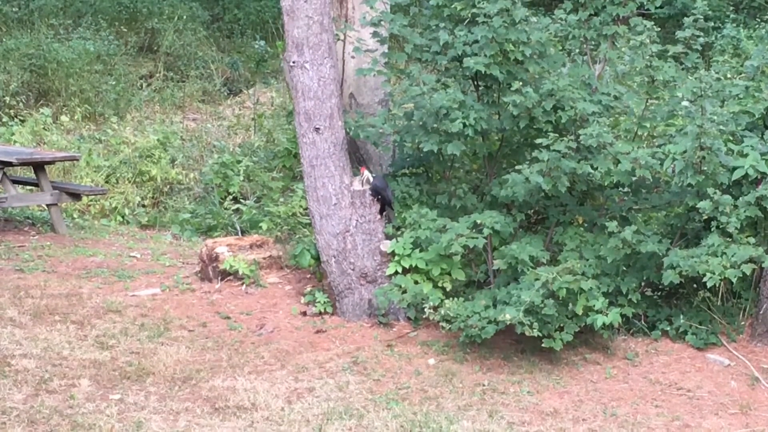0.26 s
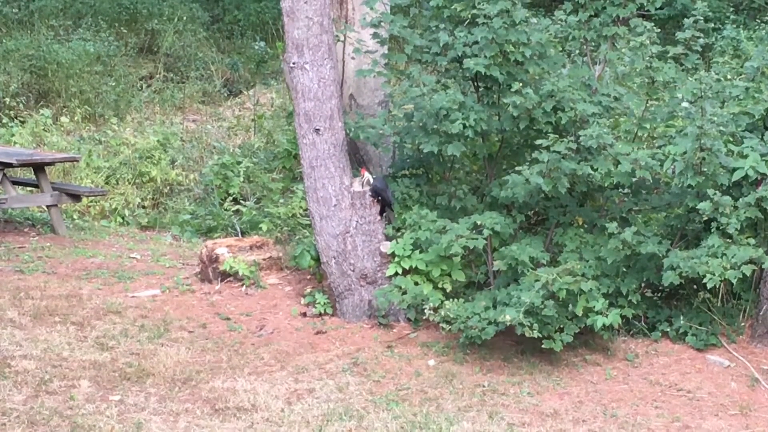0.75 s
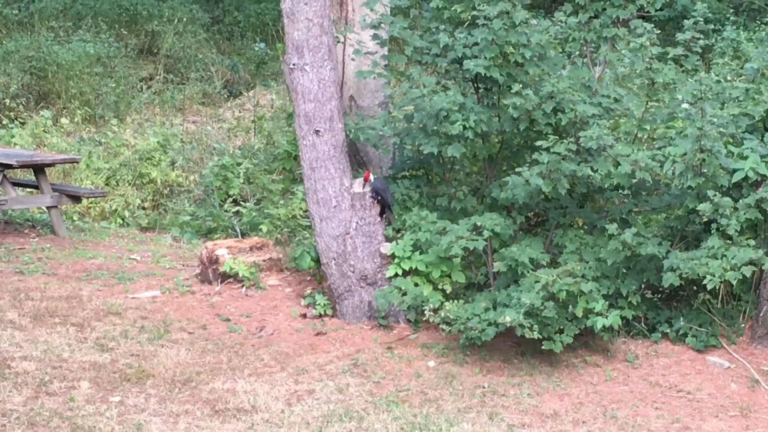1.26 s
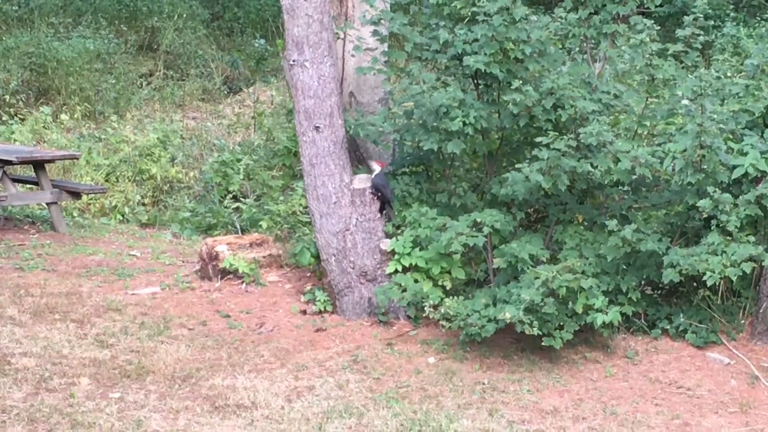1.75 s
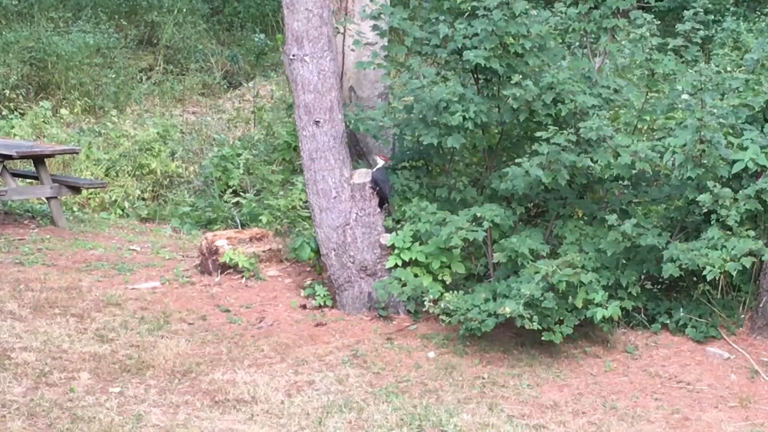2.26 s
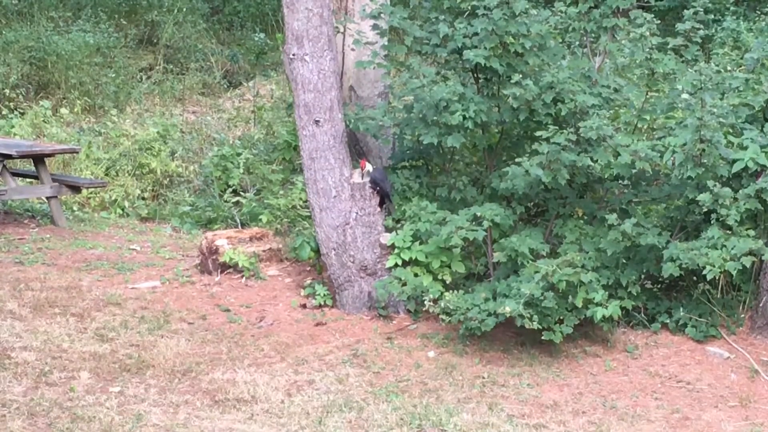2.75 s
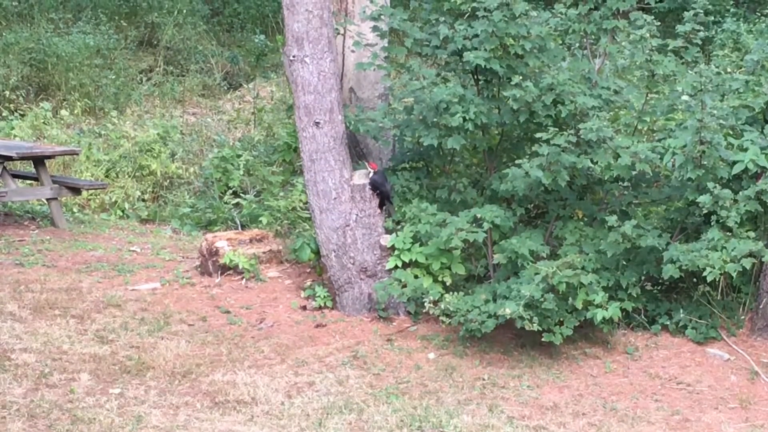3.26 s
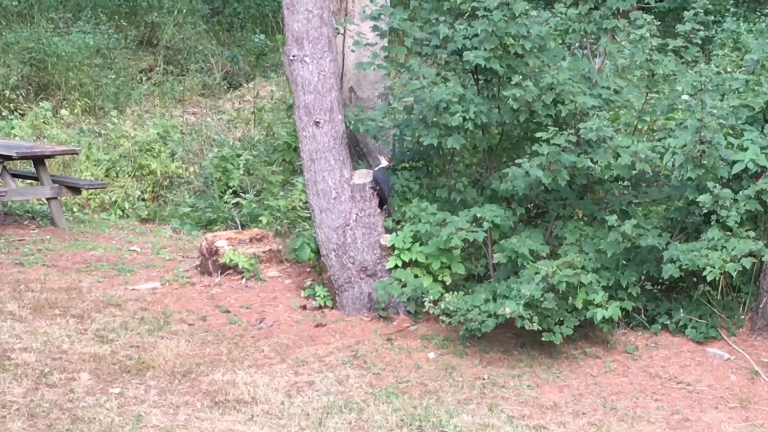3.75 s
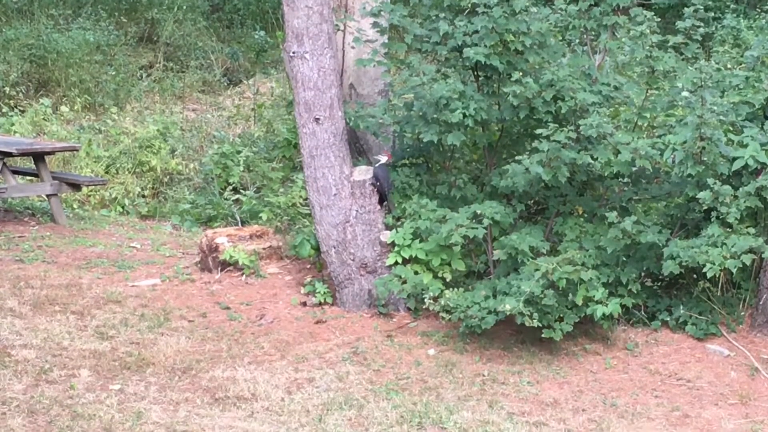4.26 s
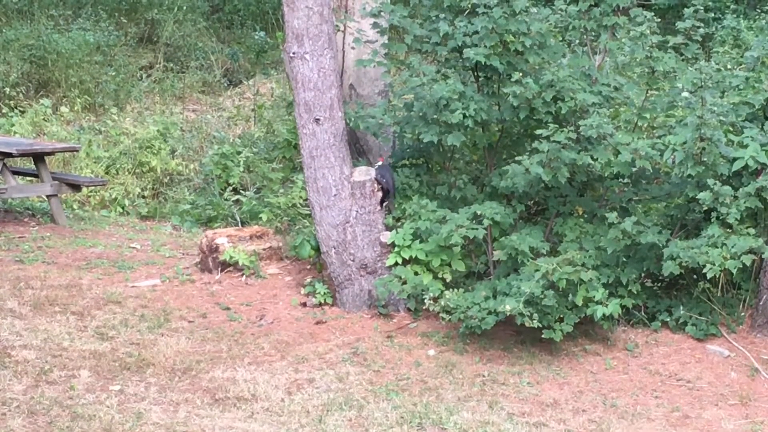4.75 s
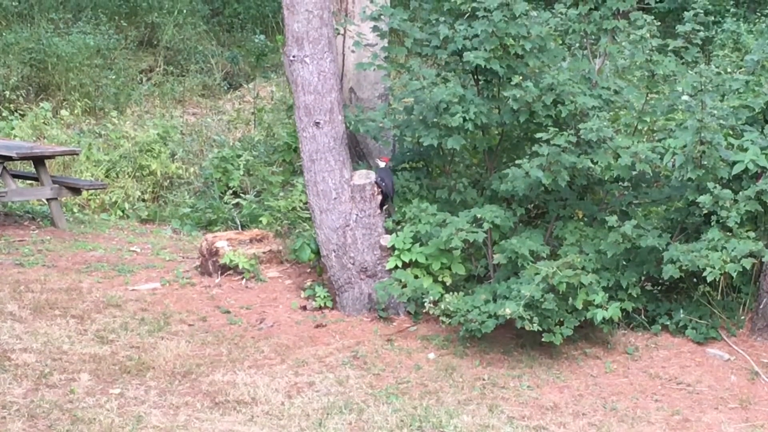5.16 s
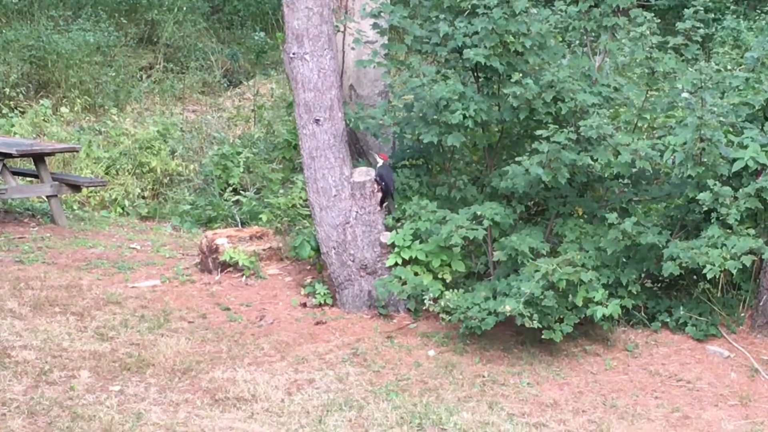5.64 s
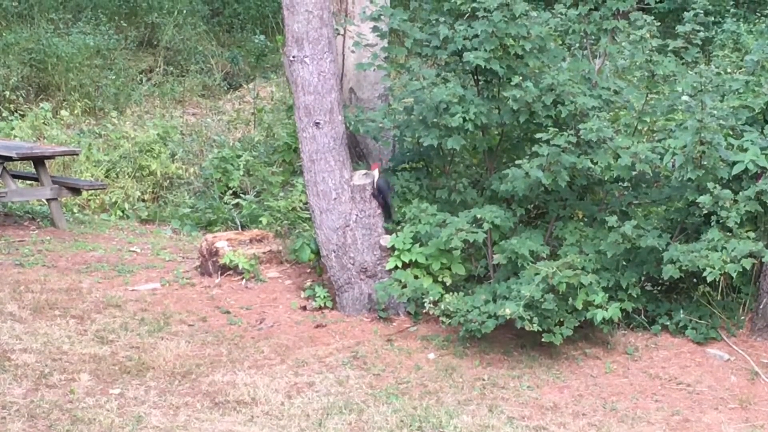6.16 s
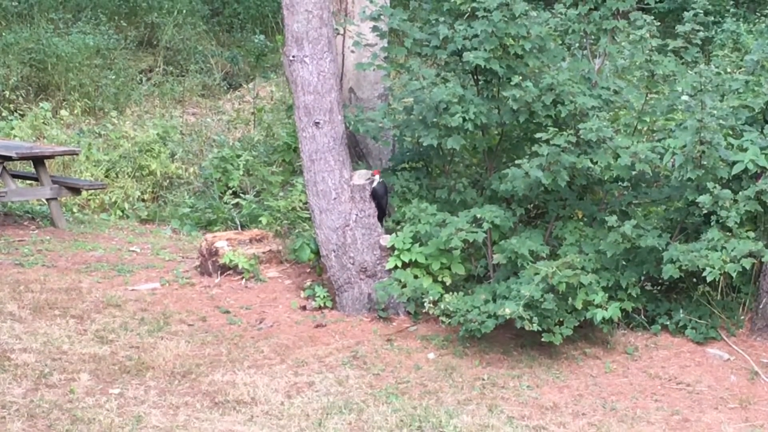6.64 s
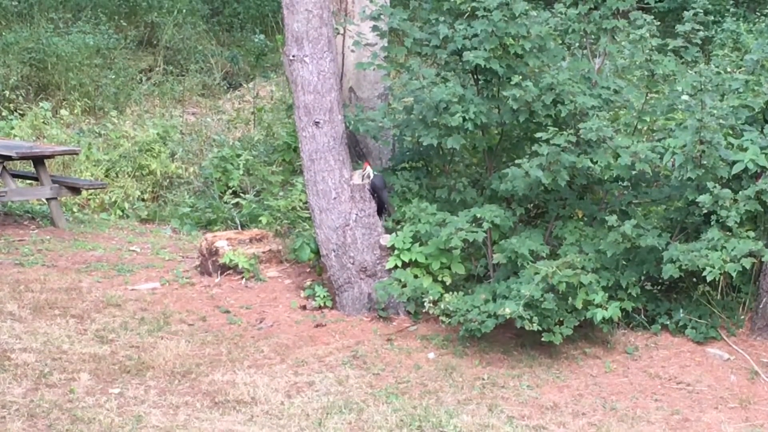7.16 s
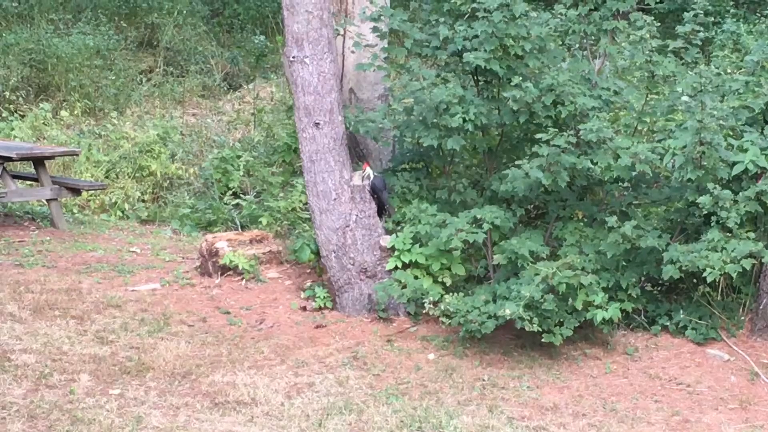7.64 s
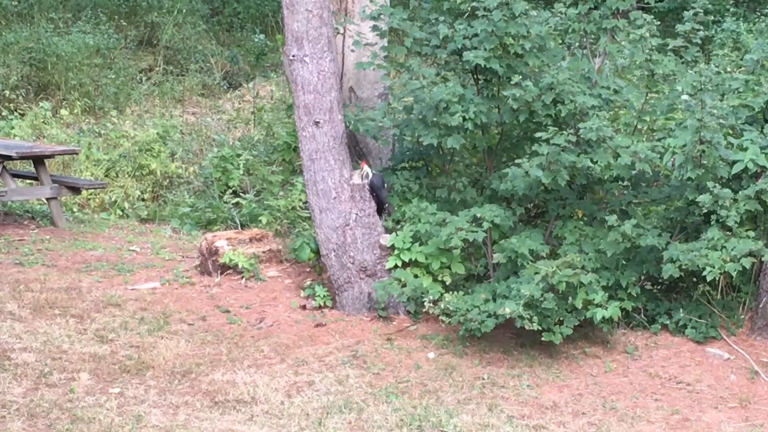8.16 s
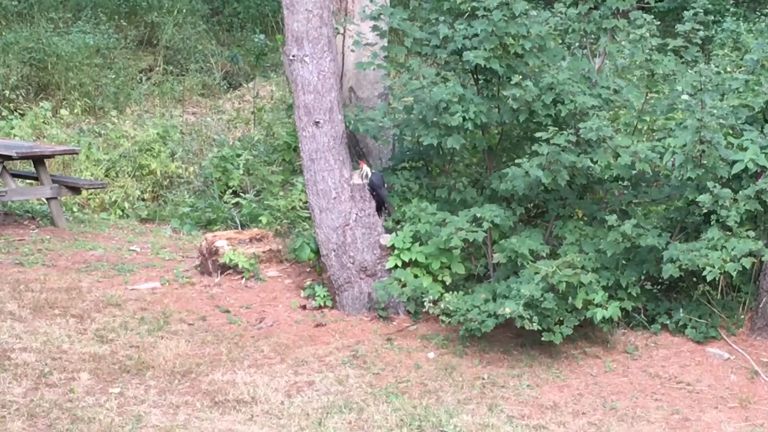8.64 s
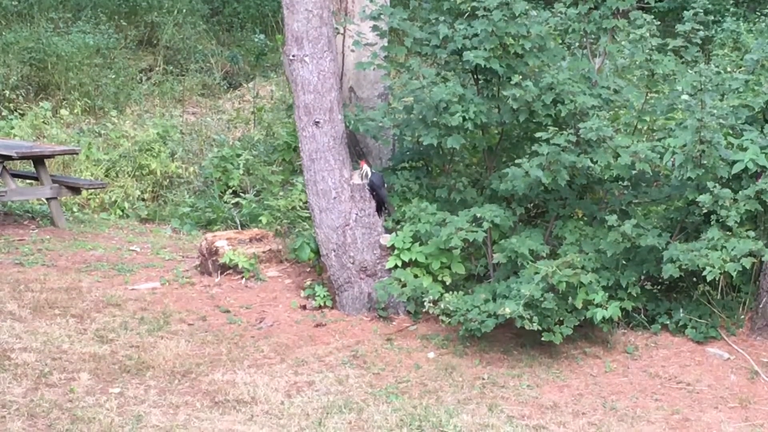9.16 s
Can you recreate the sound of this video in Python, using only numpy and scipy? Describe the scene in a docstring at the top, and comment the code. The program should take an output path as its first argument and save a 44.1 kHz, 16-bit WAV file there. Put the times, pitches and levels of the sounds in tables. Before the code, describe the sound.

In a quiet yard beside woods, a faint motor hum, traffic rumble and unbroken high insect trill run throughout. After two seconds a bird begins short arched yelps and hoarse squeals that jump upward. A woodpecker taps a soft stump only occasionally, lightly and dryly. Distant songbirds whistle slow sagging notes and twitter very high. Calls and taps echo briefly among trees; one outdoor microphone, at some distance.

```python
"""A bird yelps and squeals in short arched tones with rough overtones in a quiet back yard at the edge of a wood.
A woodpecker picks lightly at a dead stump: each tap is a burst of noise over damped modes of the wood.
Farther off, one songbird whistles slow falling notes, another warbles very high, and an insect trills
without pause as a stream of short falling tones. A distant motor hums as a few unsteady sines, under shaped
noise for traffic and air. Every bird call and tap is convolved with echoes scattered by the trees."""
import sys
import numpy as np
from scipy import signal
from scipy.fft import rfft, irfft, next_fast_len
from scipy.io import wavfile
from scipy.ndimage import uniform_filter1d, map_coordinates

SR = 44100
rng = np.random.default_rng(int(sys.argv[2]) if len(sys.argv) > 2 else 0)


def file_out(sig):
    """Save sig as 16-bit WAV at sys.argv[1]."""
    # one column per channel
    cols = np.atleast_2d(sig).T
    # limit, then scale
    lim = np.clip(cols, -1, 1)
    pcm = np.round(lim * 32767).astype(np.int16)
    wavfile.write(sys.argv[1], SR, pcm)


N = 414540  # length in samples


def amp(db):
    """Level law: decibels to an amplitude ratio."""
    return 10 ** (np.asarray(db) / 20)


def unit(x):
    """Normalisation of signal power: scale to rms 1."""
    return x / np.sqrt(np.mean(x ** 2) + 1e-20)


def along(points, hz):
    """Interpolation of (Hz, value) points on a logarithmic frequency axis."""
    f, v = np.transpose(points)
    return np.interp(np.log(hz + 1), np.log(f + 1), v)


def wobble(rate, size=N):
    """Band-limited fluctuation: a smooth curve through random knots, rate of them a second."""
    knots = rng.standard_normal(int(size * rate / SR) + 4)
    return map_coordinates(knots, [np.arange(size) * rate / SR])


def filtered(x, response):
    """Linear filtering: multiply the spectrum by a response of frequency."""
    m = next_fast_len(N + SR // 2)
    return irfft(rfft(x, m) * response(np.fft.rfftfreq(m, 1 / SR)), m)[:N]


def noise(response):
    """Coloured noise: white noise shaped by a response and scaled to rms 1."""
    return unit(filtered(rng.standard_normal(N), response))


def add(track, s, sound):
    """Superposition: mix a sound into the track at s seconds."""
    part = track[max(round(s * SR), 0):][:len(sound)]
    part += sound[:len(part)]


def course(length):
    """Normalised time: runs from 0 to 1 over length seconds."""
    return np.linspace(0, 1, int(length * SR))


def swell(u):
    """Amplitude envelope: half a sine cycle, a rounded rise and fall."""
    return np.abs(np.sin(np.pi * u))


def turns(hz):
    """Frequency modulation: phase in radians is the running sum of a moving pitch."""
    return 2 * np.pi * np.cumsum(hz) / SR


def among_trees(x, near_db, far_db, delay=0.022, spread=0.019):
    """Multiple scattering: direct sound, an echo cluster from the nearest trunks, and the wood's long tail."""
    # Decay of the wood. Each row: frequency in Hz, t60 in seconds.
    decay = [(500, 0.19), (2000, 0.54), (4000, 0.67), (8000, 0.49), (14000, 0.083)]
    hz, t, z = signal.stft(rng.standard_normal(SR // 2), SR, nperseg=256)
    t60 = along(decay, hz)[:, None]
    tail = signal.istft(z * amp(-60 * t / t60), SR, nperseg=256)[1]
    t = np.arange(len(tail)) / SR
    tail = tail * (1 - np.exp(-t / 0.01))  # scattered sound builds up gradually
    near = rng.standard_normal(len(t)) * np.exp(-((t - delay) / spread) ** 2 / 2)
    # levels are energies relative to the direct sound
    path = amp(near_db) * near / np.linalg.norm(near) + amp(far_db) * tail / np.linalg.norm(tail)
    path[0] += 1
    return signal.fftconvolve(x, path)


def yelps():
    """Period doubling: arched tones fray as they fall; forced ones carry overtones at half multiples too."""
    # Each row: start in seconds, length before release in seconds, crest in Hz, crest position as a share
    # of that length, relative level in dB, relative overtone level in dB.
    calls = [(2.662, .05, 2070, .2, -52.5, -13.5), (2.907, 0.04, 1715, 0.51, -50, -25),
             (3.128, 0.036, 1660, 0.51, -54, -26), (3.437, 0.056, 2158, 0.46, -52, -26),
             (3.98, 0.039, 1850, 0.5, -55.5, -20), (4.376, 0.056, 2140, .45, -55, -27),
             (4.751, 0.05, 2390, 0.24, -55, -14), (6.753, 0.016, 1463, 0.63, -53, -25),
             (6.776, 0.05, 2050, 0.43, -55.5, -14), (6.987, 0.023, 2150, 0.48, -63.5, -21),
             (7.146, 0.059, 2680, 0.76, -57.5, -14), (7.436, 0.064, 2490, .5, -55.5, -12.5),
             (7.602, .048, 2180, .6, -61.5, -17), (7.762, 0.051, 2475, 0.75, -59.5, -15),
             (7.96, .037, 2150, .55, -59, -16), (8.267, 0.044, 2140, 0.14, -57, -10),
             (8.645, 0.043, 1840, 0.35, -59.5, -6.5), (8.884, .045, 1884, 0.5, -56.5, -12.5),
             (9.131, 0.04, 2060, .28, -54, -31)]
    # Overtones; half multiples come from alternating cycles. Each row: multiple of the pitch, level in dB.
    overtones = [(3 / 2, -1.3), (2, -0.89), (5 / 2, -6), (3, -13)]
    release_s, fade_db = 0.012, 7  # the note lets go; its loss from start to end
    jitter, shimmer_db = .028, 1.8  # roughness of pitch (share) and of level
    fray_db = -15.5  # rough line between the first two harmonics
    out = np.zeros(N)
    for s, length, crest_hz, crest, db, overtone_db in calls:
        u = course(length + release_s)
        hz = crest_hz * arch(np.arange(len(u)) / SR, crest * length)
        phase = turns(hz * (1 + jitter * wobble(911, len(u))))
        roughness = u * (.7 + wobble(1200, len(u)))  # grows through the note
        fray = amp(fray_db) * roughness * throat(1.5 * hz) * np.sin(1.5 * phase)
        stack = 0
        for k, level_db in overtones:
            strength = amp(level_db) * (0.6 + 0.75 * wobble(707, len(u)))
            stack = stack + strength * throat(k * hz) * np.sin(k * phase)
        tone = amp(-fade_db * u ** 2) * np.sin(phase) + amp(overtone_db) * stack
        envelope = swell(u) ** 0.87 * amp(shimmer_db * wobble(236, len(u)))
        note = envelope * (tone + fray)
        add(out, s, among_trees(amp(db + 6) * note, near_db=-5.5, far_db=-10.5))
    return out


def arch(t, crest_s):
    """Pitch glide as a share of the crest: a climb, a rounded top, a faster plunge."""
    rise, fall = 14, 18  # limiting slopes, octaves per second
    rounding_s = 0.00802
    slope = np.where(t < crest_s, rise, fall)
    return 2 ** (-slope * (np.hypot(t - crest_s, rounding_s) - rounding_s))


def throat(hz):
    """Resonance: the throat favours whatever passes near its resonant frequency."""
    resonance_hz, half_width_hz, peak_db = 2460, 340, 0.5
    return 1.0 + amp(peak_db) / (1 + ((hz - resonance_hz) / half_width_hz) ** 2)


def second_voice():
    """Independent sources: short, nearly level tones from the other side of the syrinx."""
    # Each row: start in seconds, length in seconds, pitch in Hz, relative level in dB.
    tones = [(2.413, 0.012, 4420, -44), (4.772, 0.024, 3180, -54), (7.448, 0.02, 4060, -57),
             (7.483, 0.021, 3690, -53)]
    out = np.zeros(N)
    for s, length, hz, db in tones:
        u = course(length)
        pitch = 1 - 0.21 * (u - .5) ** 2 + 0.037 * wobble(910, len(u))
        note = swell(u) * np.sin(turns(hz * pitch))
        add(out, s, among_trees(amp(db + 4) * note, near_db=-1.5, far_db=-7.5))
    return out


def squeals():
    """Register break: a forced note starts low with a strong overtone, jumps up, and drops away hoarsely."""
    # Each row: start in seconds, length in seconds, crest in Hz, nominal end pitch in Hz,
    # relative level in dB, overtone boost in dB.
    calls = [(2.39, 0.076, 3390, 1564, -48.5, 5.5), (5.314, 0.092, 3650, 2016, -50.5, 6),
             (5.743, .088, 4075, 4020, -49.5, 1), (6.32, 0.08, 3606, 2320, -49, 2.5)]
    # Course of a squeal. Each row: share of its length, share of crest pitch before the final drop,
    # relative fundamental level in dB, relative overtone level in dB.
    register_break = [(0, .48, -17, -19), (.2, .61, -12, -11), (0.319, .66, -11, -4.5),
                      (0.459, .88, -21, -11.5), (.62, 1, 2, -30), (.78, 1, -3, -2.5), (1, 0.97, -10.5, -21)]
    # Radiation of the beak. Each row: frequency in Hz, gain in dB.
    beak = [(1200, 18.5), (2200, 4), (4500, 0), (6700, -7), (7600, -13.5), (11000, -17.5), (15000, -26)]
    # Hoarse noise after the beak. Each row: frequency in Hz, relative density in dB per Hz.
    rasp_spectrum = [(1200, -21), (2200, -3.5), (3400, 2), (4500, -4), (6600, -2), (7600, -22),
                     (11000, -24), (15000, -28.5)]
    out = np.zeros(N)
    share, *columns = np.transpose(register_break)
    # the beak's gain is taken out here because the whole voice passes the beak at the end
    hoarse = noise(lambda f: amp(along(rasp_spectrum, f) - along(beak, f)))
    for s, length, crest_hz, end_hz, db, overtone_db in calls:
        u = course(length)
        pitch, first_db, second_db = [np.interp(u, share, c) for c in columns]
        fall = np.clip((u - .68) / .32, 0, 1) ** 1.5
        hz = crest_hz * pitch + (end_hz - crest_hz) * fall
        # the pitch is roughest early in the note and steadies toward its end
        jitter = (.022 + .018 * (1 - u)) * wobble(1100, len(u))
        phase = turns(hz * (1 + jitter))
        stack = np.sin(2 * phase) + amp(-8) * np.sin(3 * phase) + amp(-5.5) * np.sin(4 * phase)
        overtones = amp(second_db + overtone_db) * stack
        rasp = amp(-3.0) * swell(u) * hoarse[round(s * SR):][:len(u)]
        envelope = swell(u) ** 0.13 * amp(1.4 * wobble(287.0, len(u)))
        note = envelope * (amp(first_db) * np.sin(phase) + overtones + rasp)
        add(out, s, among_trees(amp(db + 2) * note, near_db=-3, far_db=-8))
    return filtered(out, lambda f: amp(along(beak, f)))


def pecks():
    """Impact excitation: the bill cracks bark and briefly rings the damped modes of the soft stump."""
    # Bill taps. Each row: time in seconds, relative level in dB, relative knock level in dB.
    taps = [(2.058, -50, -8), (2.8746, -47, -7), (4.6197, -48, 1), (4.6344, -49, -1), (6.266, -44.5, -14),
            (6.321, -39, -19), (6.757, -48, 2)]
    # Modes of the stump. Each row: mean frequency in Hz, mean relative level in dB, t60 in seconds.
    wood = [(890, -7, .025), (1566, -2, 0.018), (2840, -17, 0.029), (3300, -1, .018)]
    out, t = np.zeros(N), np.arange(SR // 10) / SR
    for s, db, knock_db in taps:
        ring = 0
        for hz, level, t60 in wood:
            decay = amp(level + rng.normal(0, 2) - 60 * t / t60)
            ring = ring + decay * np.sin(2 * np.pi * hz * rng.normal(1, .04) * t)
        crack = uniform_filter1d(rng.standard_normal(len(t)), size=3) * amp(-60 * t / .022)
        blow = amp(db) * (amp(-3) * crack + amp(knock_db - 14) * ring)
        add(out, s, among_trees(blow, near_db=-7.0, far_db=-13))
    return out


def splinters():
    """Fracture noise: prying with the bill sheds clumps of tiny snaps from the bark."""
    # Each row: start in seconds, length in seconds, relative level in dB.
    clumps = [(4.923, .015, -76), (6.045, 0.056, -71), (7.062, .022, -71), (8.83, 0.032, -73),
              (9.15, .018, -72)]
    out = np.zeros(N)
    for s, length, db in clumps:
        u = course(length)
        uneven = rng.standard_normal(len(u)) * amp(2.0 * wobble(580, len(u)))
        snaps = unit(uniform_filter1d(uneven, size=3))
        add(out, s, among_trees(amp(db + 6.5) * swell(u) * snaps, near_db=-7, far_db=-9))
    return out


def whistles():
    """Frequency glide: far whistles scoop up, then sag and fade, fluttering, with a faint upper line."""
    # Each row: start in seconds, length in seconds, nominal crest in Hz, end in Hz, relative level in dB.
    calls = [(1.959, 0.47, 3210, 2920, -68), (4.901, 0.39, 3230, 3090, -64), (5.535, 0.19, 3210, 3040, -66),
             (8.614, .46, 3300, 3053, -65.5), (9.167, 0.34, 3290, 3170, -68)]
    scoop_hz = 162  # every whistle starts this flat
    flutter_rate, flutter_db = 39.6, 4  # random knots a second, depth
    out = np.zeros(N)
    for s, length, crest_hz, end_hz, db in calls:
        u = course(length)
        hz = crest_hz + (end_hz - crest_hz) * u ** 1.5 - scoop_hz * np.exp(-u / 0.0703)
        phase = turns(hz + 32 * wobble(118.6, len(u)))
        upper = amp(-11) * u * np.sin(1.26 * phase)  # inharmonic, grows through the note
        tone = np.sin(phase) + upper + amp(-23) * np.sin(2 * phase)
        level_db = 3 - 3.3 * u + flutter_db * wobble(flutter_rate, len(u))
        note = swell(u ** 0.65) * amp(level_db) * tone
        add(out, s, among_trees(amp(db - 5.0) * note, near_db=-7, far_db=1.0))
    return out


def thin_tone():
    """Pure tone: one faint, nearly level whistle that starts before the others."""
    out, u = np.zeros(N), course(1.8)
    tone = np.sin(turns(2880 + 18 * wobble(60, len(u))))
    add(out, .42, among_trees(amp(-85) * swell(u) ** 0.35 * tone, near_db=0, far_db=-2))
    return out


def twitters():
    """Frequency modulation: runs of very high syllables, sharp-starting fast warbles blurred by echoes."""
    # Each row: start in seconds, pitch in Hz, relative level in dB.
    runs = [(.18, 7700, -62), (2.862, 8230, -59), (4.168, 8260, -57), (5.70, 8290, -56.5),
            (8.119, 8250, -59)]
    # One run. Each row: delay in seconds, share of the run's pitch, relative level in dB.
    syllables = [(-.03, .88, -11), (0, .96, -4), (.066, .99, 0), (.138, .99, 0), (.21, .965, -4)]
    out, u = np.zeros(N), course(0.048)
    for s, hz, db in runs:
        for delay, pitch, level_db in syllables:
            swing = 400 * np.sin(turns(170 + 30 * wobble(60, len(u))))  # Hz, about 170 swings a second
            warble = swing + 110 * wobble(700, len(u))
            note = swell(np.sqrt(u)) ** .5 * np.sin(turns(hz * pitch + warble))
            add(out, s + delay, among_trees(amp(db + level_db - 6.5) * note, near_db=-8, far_db=-1.5))
    return out


def insect_trill(rate_hz=59.6, pitch_hz=5230, droop_hz=380):
    """Pulse train: each wing stroke of the nearest insect is a short falling tone."""
    stroke = np.cumsum(rate_hz * (1 + 0.014 * wobble(6))) / SR % 1
    tone = np.sin(turns(pitch_hz - droop_hz * (stroke - .5) + 55 * wobble(500)))
    pulse = swell(stroke) ** 6
    return amp(-73.5 + 2.1 * wobble(60)) * unit(pulse * tone)


def insect_chorus():
    """Incoherent addition: farther insects merge into narrow bands of hiss."""
    # Each row: centre in Hz, full width at half amplitude in Hz, rms level in dB.
    bands = [(5220, 220, -80.5), (7090, 360, -82.5), (10400, 200, -94.5), (10200, 66, -94)]
    return sum(amp(db) * noise(lambda f: 1 / (1 + (2 * (f - hz) / width) ** 2)) for hz, width, db in bands)


def motor():
    """Line spectrum: an unsteady distant hum of sines drifting in pitch and level."""
    # Each row: mean frequency in Hz, mean rms level in dB.
    lines = [(58.5, -54), (116, -66.5), (231, -66), (290, -66), (565, -74.5), (657, -74.5)]
    hum = 0
    for hz, db in lines:
        line = unit(np.sin(turns(hz + 2.48 * wobble(12))))
        hum = hum + amp(db + 2.5 * wobble(7)) * line
    return hum


def traffic():
    """Low-frequency broadband noise: the rumble of far traffic, slightly uneven in level."""
    # Each row: frequency in Hz, relative density in dB per Hz.
    spectrum = [(20, -38), (31, -14), (41, -2), (55, 3), (75, 0), (105, -5.5), (150, -12), (195, -13.5),
                (250, -9.5), (300, -11.5), (350, -9.5), (430, -21), (600, -51.5)]
    return amp(-50.0 + 0.51 * wobble(6.1)) * noise(lambda f: amp(along(spectrum, f)))


def open_air():
    """Broadband noise: open-air hiss, slightly uneven in level."""
    # Each row: frequency in Hz, relative density in dB per Hz.
    spectrum = [(240, -20.5), (400, -1), (500, -1), (680, -2), (1080, -5.5), (1600, -12), (2500, -19.5),
                (3300, -22.5), (4200, -26.5), (5200, -15.5), (6000, -27), (7800, -33.5), (10000, -35.5),
                (15500, -50)]
    return amp(-61.0 + 0.38 * wobble(3.02)) * noise(lambda f: amp(along(spectrum, f)))


def scene():
    """Superposition: everything in the yard summed at one microphone."""
    bird = yelps() + second_voice() + squeals()
    woodpecker = pecks() + splinters()
    songbirds = whistles() + thin_tone() + twitters()
    insects = insect_trill() + insect_chorus()
    return (bird + woodpecker + songbirds + insects + motor() + traffic() + open_air())[None]


def record(dry):
    """Band limiting: an ideal low-pass keeps nothing above the top frequency."""
    top_hz = 15720
    return np.array([filtered(channel, lambda hz: hz < top_hz) for channel in dry])


dry = scene()
out = record(dry)
file_out(out)
```